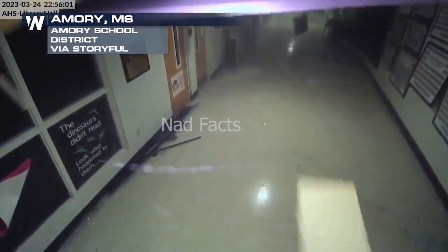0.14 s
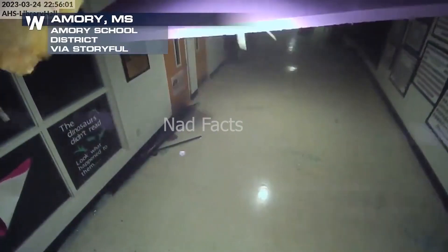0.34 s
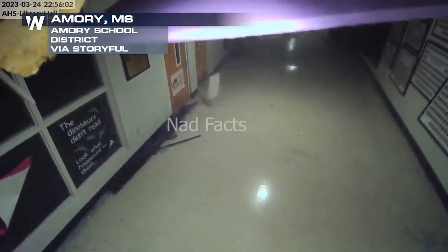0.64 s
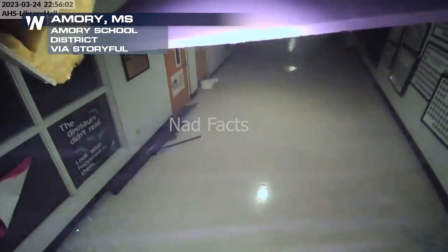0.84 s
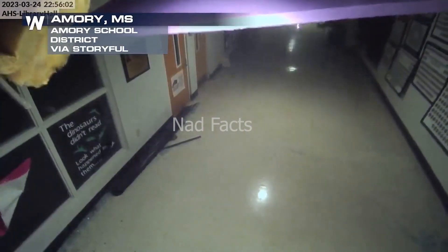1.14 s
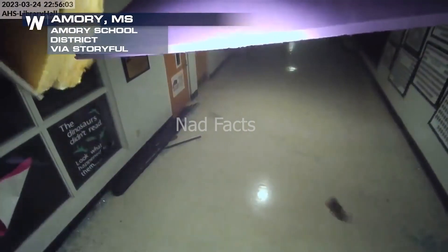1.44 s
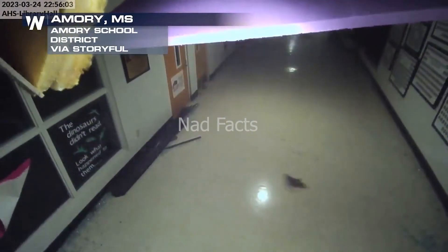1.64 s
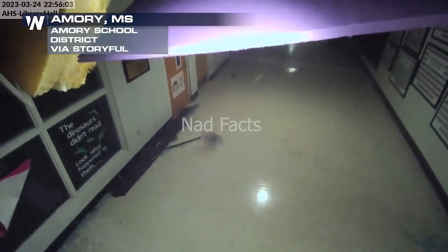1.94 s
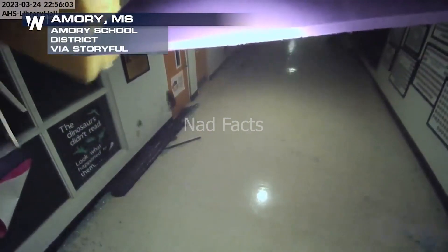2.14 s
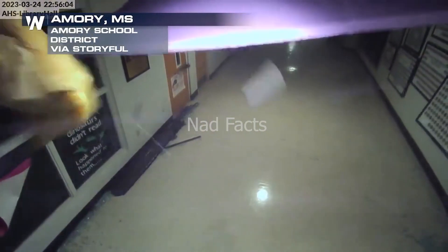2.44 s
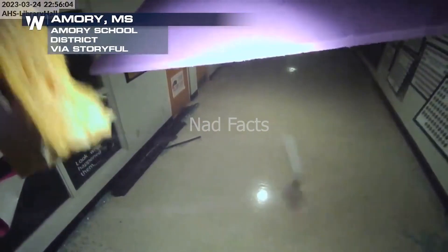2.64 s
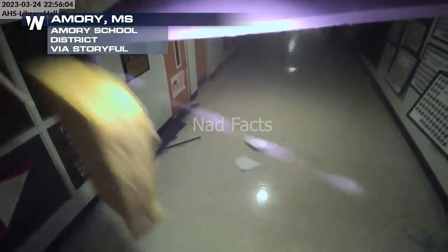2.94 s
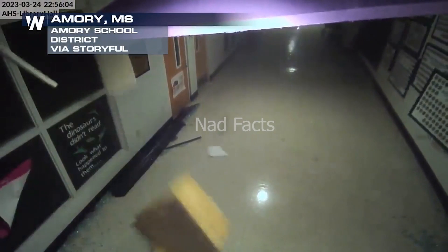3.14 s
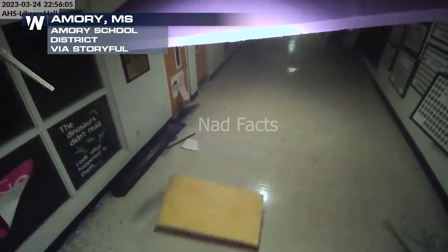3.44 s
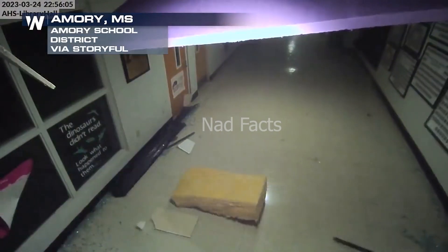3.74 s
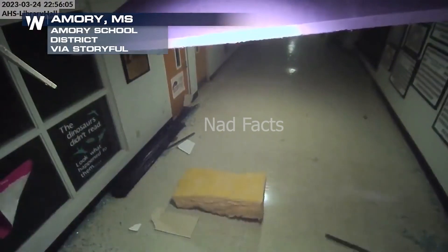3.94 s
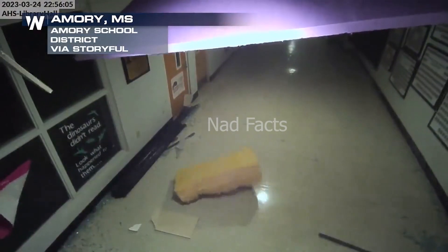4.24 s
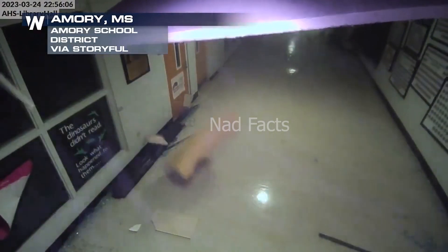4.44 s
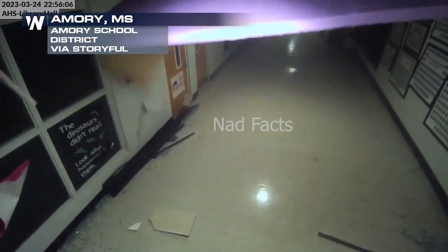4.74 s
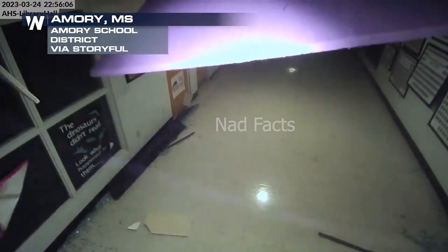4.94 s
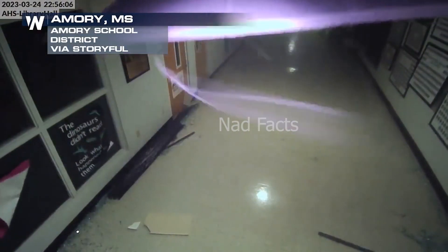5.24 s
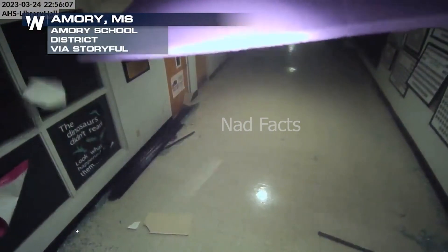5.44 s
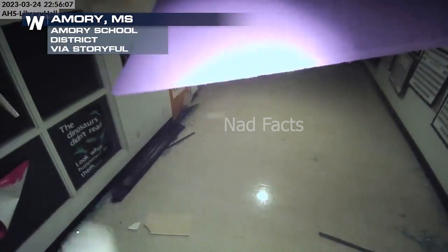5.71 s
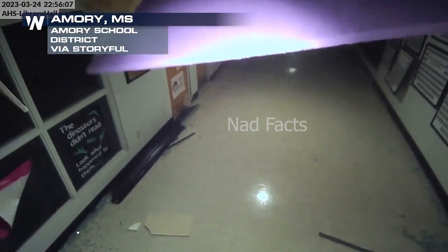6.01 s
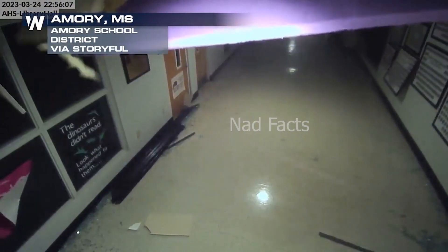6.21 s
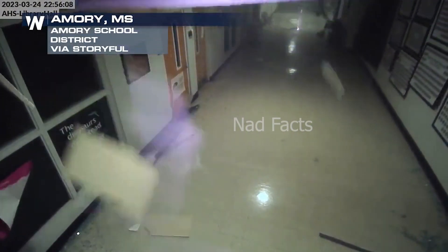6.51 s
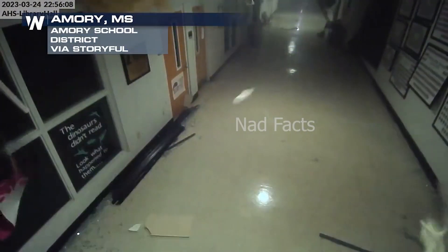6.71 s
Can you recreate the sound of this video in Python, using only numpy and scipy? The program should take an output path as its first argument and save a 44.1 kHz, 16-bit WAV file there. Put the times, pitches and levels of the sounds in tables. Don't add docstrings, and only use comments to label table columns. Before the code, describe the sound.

Distorted tornado wind roars down a hallway, with low flutter, airy whistles and fizzy treble, before an abrupt harder blast throws knocking debris.

```python
import sys
import numpy as np
from scipy import signal
from scipy.fft import rfft, irfft
from scipy.io import wavfile
from scipy.ndimage import uniform_filter1d

SR = 44100
rng = np.random.default_rng(int(sys.argv[2]) if len(sys.argv) > 2 else 0)


def waveform_to_disk(signal):
    frames = np.transpose(np.atleast_2d(signal))
    scaled = np.clip(frames, -1, 1) * 32767
    samples = np.round(scaled).astype(np.int16)
    wavfile.write(sys.argv[1], SR, samples)


def decibels_to_gain(level_db):
    exponent = np.asarray(level_db, float) / 20
    return 10 ** exponent


N = 302967

# [t/s, gust level/dB, eddy size (-1 small to 1 large), draught level/dB]
WIND = [(.38, -20, 0.75, -26), (0.501, -30.5, .2, -23.5), (.7, -26.5, 0.078, -27.5), (.9, -33, 0, -24.5),
        (1.298, -28, .6, -25), (1.8, -28, 0.013, -24.5), (2.29, -24.5, -0.58, -26), (2.55, -34, 0.35, -27),
        (3.05, -37.5, -0.18, -29.5), (3.685, -36, 0.82, -29.5), (3.686, -11, -1.6, -27),
        (3.94, -14.5, -0.79, -30.5), (4.299, -13.5, 0.12, -26), (4.95, -20.5, 0.46, -27),
        (5.6, -21, 0, -25), (6.657, -24.5, 0, -26), (6.658, -14.5, 0.066, -29.5), (6.87, -17, .2, -26.5)]
# [middle t/s, length/s, lift/dB]
SURGES = [
    (0, 0.052, -11.5),
    (.77, 0.16, 4.5),
    (1.925, 0.22, 11),
    (2.05, 0.33, 6),
    (3.22, 0.38, 11.5),
    (4.59, 0.18, -0.5),
    (5.11, 0.38, -3.5),
    (5.88, .3, 3),
    (6.12, 0.34, -4),
    (6.28, 0.24, 0),
]
# [middle t/s, length/s, lift/dB]
FLAPS = [
    (.15, .34, 8),
    (1.09, 0.47, 8),
    (1.4, 0.29, 9.5),
    (2.42, .2, -6.5),
    (4.07, .24, -2),
    (4.2, 0.15, 2),
    (5.25, 0.2, 1.5),
    (5.7, 0.44, 4),
]
# [middle t/s, length/s, lift/dB]
PUSHES = [(1.27, 0.16, 0), (1.58, 0.45, 16), (2.04, 0.27, 16), (2.68, 0.35, -11.5), (4.07, .24, 8),
          (4.33, .2, 0.5), (4.52, 0.3, -13.5), (4.93, 0.28, 6), (5.22, 0.21, -5), (5.37, 0.24, 0),
          (6.6, .2, -4)]
# [f/Hz, level/dB per Hz]
HEAVE_COLOUR = [(2, -20), (5, -6), (10, -2), (20, 1.5), (32, -15.5), (60, -37.5)]
# [f/Hz, level/dB per Hz]
BUFFET_COLOUR = [(18, -19.5), (33, 0.5), (48, 1.5), (65, -5.5), (110, -5.5), (170, -10), (300, -25),
                 (600, -54.5)]
# [f/Hz, level/dB per Hz]
ROAR_COLOUR = [(100, -23.5), (200, -0.5), (330, -3), (460, -3), (560, -16), (900, -11), (1600, -31.5)]
# [f/Hz, level/dB per Hz]
HISS_COLOUR = [(300, -18), (600, -1), (1000, -1.5), (1450, 2), (1600, -2), (1850, -0.5), (2050, 1.5),
               (2600, 0.5), (3300, -10), (4500, -22.5)]
# [t/s, length/s, direction (+1 or -1)]
SHOVES = [(.04, .009, -1), (0.066, .012, -1), (.08, .012, 1), (0.138, .013, 1), (.274, .01, 1),
          (1.371, .011, 1), (1.444, .012, -1), (1.563, .011, -1), (1.969, .01, 1), (2.017, .01, -1),
          (3.744, .009, 1), (3.76, .01, -1), (3.923, .01, -1), (3.934, .009, 1), (3.95, .011, -1),
          (4.017, .008, -1), (4.171, 0.01, 1), (4.183, .013, -1), (4.222, .01, 1), (4.293, .013, -1),
          (4.375, .009, 1), (4.411, 0.012, -1), (4.702, 0.012, -1), (4.716, 0.012, 1), (4.823, 0.014, -1),
          (4.882, .012, -1), (5.505, .008, -1), (5.653, .009, -1), (5.823, .01, -1), (6.691, 0.0093, -1)]
# [t/s, peak level/dB, f/Hz]
KNOCKS = [
    (1.458, -17.5, 1040),
    (3.753, -13.5, 741),
    (3.943, -12, 611),
    (4.202, -18.5, 589),
    (4.425, -6.5, 599),
    (4.757, -17, 637),
    (4.86, -16, 853),
    (5.662, -17, 1254),
]
# [t/s, length/s, f/Hz, width/Hz, level/dB]
MOANS = [(0.3, 0.67, 2000, 590, -29), (2.297, 1.72, 2526, 1100, -32.5), (0.33, 0.015, 1900, 60, -22.5),
         (0.58, 0.17, 2300, 130, -34), (2.1, 0.11, 120, 31, -21), (2.29, .08, 140, 50, -25),
         (2.1, 0.046, 73, 40, -17), (2.20, .12, 400, 73, -21.5), (0.95, 0.17, 5200, 60, -38.5),
         (3.848, 0.098, 2800, 110, -30.5), (5.93, 0.072, 1500, 60, -29.5), (4.42, .08, 800, 570, -21),
         (4.76, 0.058, 410, 230, -18.5), (.1, .17, 70, 30, -16), (4.55, .14, 170, 70, -22),
         (1.64, 0.058, 125, 50, -26), (6.67, .19, 115, 60, -19)]
# [lower edge f/Hz, level/dB]
STAIRS = [(2580, -4), (2860, -12.5), (3040, -29.5), (3215, -110)]
# [t/s, length/s, lift/dB]
OPENINGS = [
    (0.286, 0.081, 16),
    (.50, 0.063, 11),
    (0.806, 0.065, 22.5),
    (2.665, 0.066, 13),
    (4.11, 0.047, 20),
    (4.354, 0.064, 14),
    (4.64, 0.068, 18),
    (4.77, 0.065, 14),
    (5.32, 0.07, 20.5),
    (5.95, 0.075, 21),
]
# [f/Hz, level/dB]
TREBLE = [(1, 0), (5000, 0.5), (6000, 1), (10850, 3), (11000, -3.5), (11150, -10), (11300, -20.5),
          (11440, -42.5), (11800, -79)]
# [t/s, peak level/dB]
JOINS = [
    (0.4475, -32.5),
    (1.0803, -33.5),
    (1.6257, -40),
    (1.8265, -52),
    (1.922, -48.5),
    (3.685, -37),
    (6.401, -40),
    (6.5136, -60.5),
    (6.6088, -60),
    (6.6573, -29.5),
]

RAIL_DB = -18.6


def wind():
    heave, buffet, roar, hiss = strengths()
    low = heave * turbulence(HEAVE_COLOUR, size=8192, patchy_db=-0.2, flicker_db=3.0)
    low = decibels_to_gain(RAIL_DB) * np.tanh(low / decibels_to_gain(RAIL_DB))
    flaps = turbulence(BUFFET_COLOUR, size=2048, patchy_db=0.0, flicker_db=1.4)
    flaps = evened(flaps / (uniform_filter1d(abs(flaps), size=1500) + 0.43))
    rumble = roar * turbulence(ROAR_COLOUR, size=1024, patchy_db=1.0, flicker_db=0.0)
    air = decibels_to_gain(0.5) * hiss * turbulence(HISS_COLOUR, size=512, patchy_db=0.5, flicker_db=1.33)
    return low + buffet * flaps + rumble + air


def strengths():
    s, *columns = np.transpose(WIND)
    gust_db, size, draught_db = (np.interp(np.arange(N) / SR, s, c) for c in columns)
    surge_db = swells(SURGES)
    heave_db = gust_db - 3 + 12.5 * size + 0.39 * surge_db + swells(PUSHES)
    buffet_db = gust_db + surge_db + swells(FLAPS)
    steady_db = -25
    roar_db = -28 + 0.63 * (gust_db - steady_db) - 2 * size + 0.8 * surge_db
    hiss_db = draught_db + 0.2 * surge_db
    return decibels_to_gain(heave_db), decibels_to_gain(buffet_db), decibels_to_gain(roar_db), decibels_to_gain(hiss_db)


def swells(rows):
    t = np.arange(N) / SR
    return sum(db * np.cos(np.pi * np.clip((t - s) / length, -.5, .5)) ** 2 for s, length, db in rows)


def turbulence(colour, size, patchy_db, flicker_db):
    frames, hz = 4 * N // size + 5, np.fft.rfftfreq(size, 1 / SR)
    a, b, patches = rng.standard_normal((frames, len(hz), 3)).T
    patches = uniform_filter1d(patches, size=size // 80, axis=0)
    patches = evened(uniform_filter1d(patches, size=10000 // size, axis=1))
    flicker = evened(uniform_filter1d(rng.standard_normal(frames), size=3))
    level_db = read(colour, hz)[:, None] + patchy_db * patches + flicker_db * flicker
    z = (a + 1j * b) * decibels_to_gain(level_db)
    return evened(signal.istft(z, nperseg=size, noverlap=3 * size // 4)[1][:N])


def read(points, hz):
    f, value = np.transpose(points)
    return np.interp(np.log(hz + 1), np.log(f + 1), value, left=-120, right=-120)


def evened(x):
    return x / np.sqrt(np.mean(x ** 2) + 1e-20)


def add(mix, s, sound):
    part = mix[round(s * SR):][:len(sound)]
    part += sound[:len(part)]


def shoves():
    out = np.zeros(N)
    for s, length, way in SHOVES:
        add(out, s - .001, np.sign(way) * signal.windows.tukey(round((length + .002) * SR), .3))
    return np.clip(out, -1, 1)


def knocks():
    out, t = np.zeros(N), np.arange(3000) / SR
    for s, db, hz in KNOCKS:
        crack = rng.standard_normal(len(t))
        body = evened(ring(crack, hz, 1100.0)) + 1.4 * np.sin(2 * np.pi * hz * t)
        decay = decibels_to_gain(db - 2.5 - 60 * t / 0.072)
        add(out, s, decay * body * np.minimum(t / 0.0018, 1))
    return out


def moans():
    out, air = np.zeros(N), rng.standard_normal(N)
    for s, length, hz, width, db in MOANS:
        breathy = evened(ring(air[round(s * SR):][:round(length * SR)], hz, width))
        breathy /= uniform_filter1d(abs(breathy), size=1500) + 0.078
        add(out, s, decibels_to_gain(db) * breathy * signal.windows.tukey(len(breathy), .6))
    return out


def ring(x, hz, width):
    b, a = signal.iirpeak(hz, hz / width, SR)
    return signal.lfilter(b, a, signal.lfilter(b, a, x))


def scene():
    push = shoves()
    flow = wind() * (1 - 0.37 * abs(push))
    return (flow + decibels_to_gain(-12) * push + moans() + knocks())[None]


def amplifier(x):
    rail = decibels_to_gain(RAIL_DB)
    u = x / rail
    return rail * u / (1 + abs(u) ** 6.5) ** (1 / 6.5)


def narrow_link(x):
    hz, t, z = signal.stft(x, SR, nperseg=2048, noverlap=1792)
    a, b = rng.standard_normal((len(t), len(hz), 2)).T
    grain = decibels_to_gain(2.5) * np.clip(hz / 1100, .12, 1)[:, None]
    z = z + grain * uniform_filter1d(abs(z), size=9, axis=0) * (a + 1j * b)
    level_db = np.zeros(z.shape)
    for edge_hz, db in STAIRS:
        level_db[hz >= edge_hz] = db
    last = (hz >= STAIRS[2][0]) & (hz < STAIRS[3][0])
    for s, length, lift_db in OPENINGS:
        inside = np.minimum(t - s, s + length - t)
        level_db[last] += lift_db * np.clip(inside / 0.0078 + .5, 0, 1)
    return signal.istft(z * decibels_to_gain(level_db), SR, nperseg=2048, noverlap=1792)[1][:N]


def converter(x):
    held = np.repeat(x[::4], 4)[:N] + decibels_to_gain(-86.5) * rng.standard_normal(N)
    return irfft(rfft(held) * decibels_to_gain(read(TREBLE, np.fft.rfftfreq(N, 1 / SR))), N)


def joins():
    out, t = np.zeros(N), np.arange(400) / SR
    jump = signal.lfilter(*signal.butter(N=4, Wn=9000, fs=SR), np.exp(-t / 0.00065))
    for s, db in list(JOINS) + [(6.8675, -46.5)]:
        add(out, s + .0012, decibels_to_gain(db + 12) * jump)
    return out


def low_pass(x):
    return signal.sosfilt(signal.butter(12, 11440, fs=SR, output="sos"), x)


def record(dry):
    wake = np.minimum(np.arange(N) / 25, 1)
    mix = wake * converter(narrow_link(amplifier(dry[0]))) + joins()
    return low_pass(mix[None])


dry = scene()
out = record(dry)
waveform_to_disk(out)
```